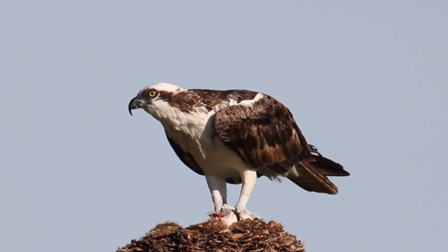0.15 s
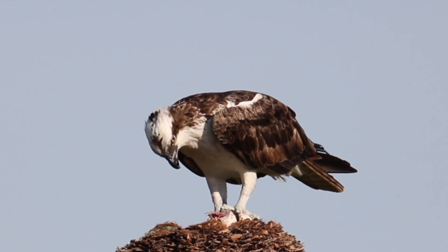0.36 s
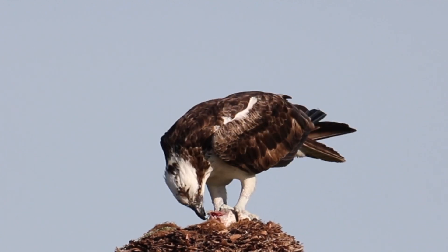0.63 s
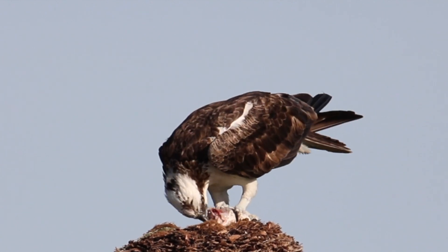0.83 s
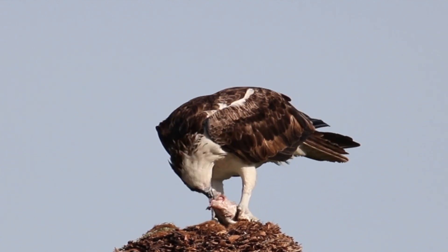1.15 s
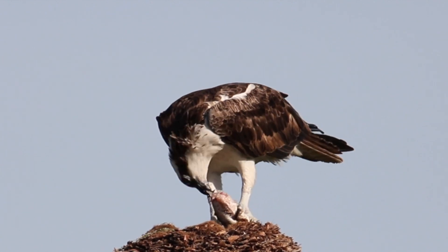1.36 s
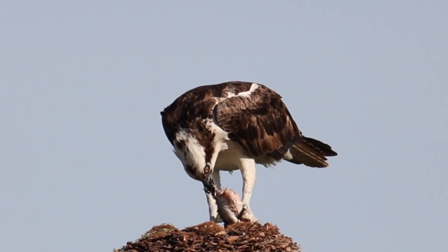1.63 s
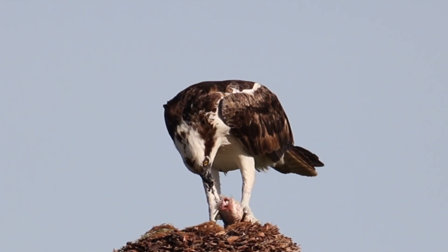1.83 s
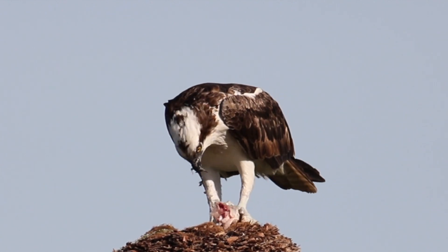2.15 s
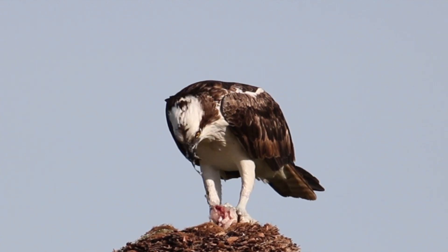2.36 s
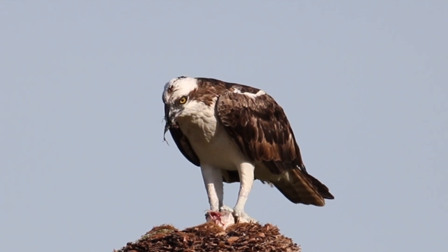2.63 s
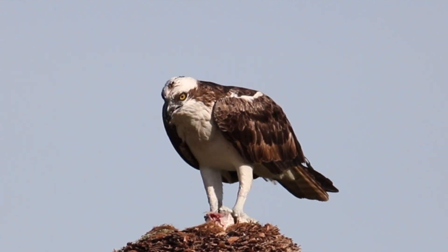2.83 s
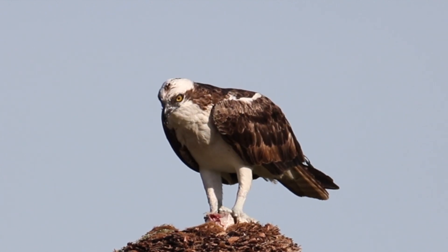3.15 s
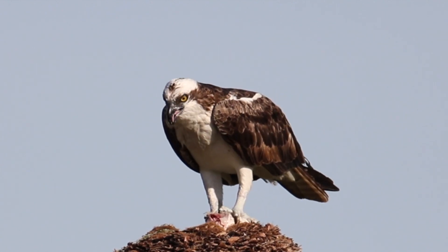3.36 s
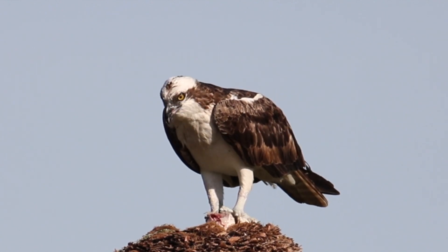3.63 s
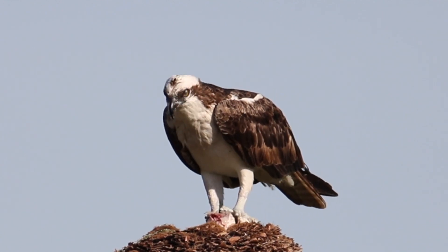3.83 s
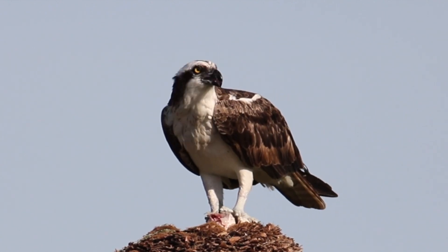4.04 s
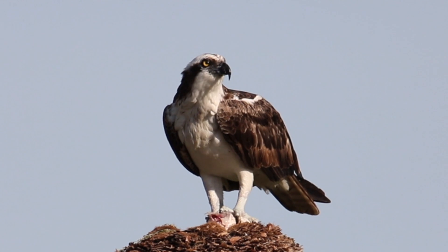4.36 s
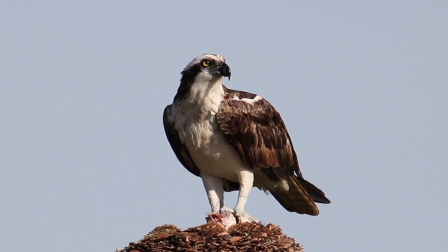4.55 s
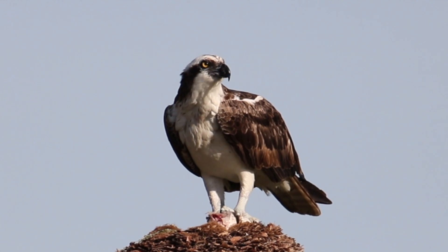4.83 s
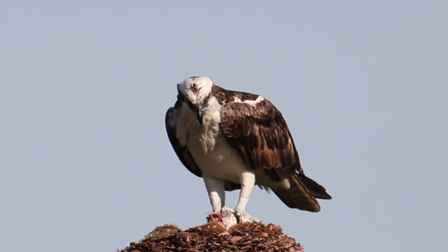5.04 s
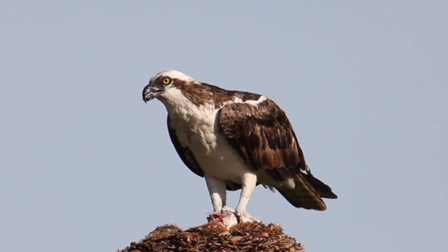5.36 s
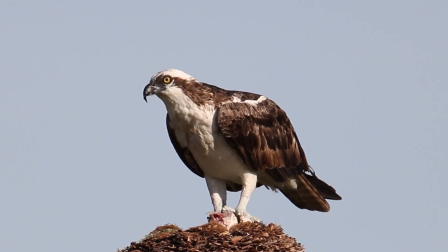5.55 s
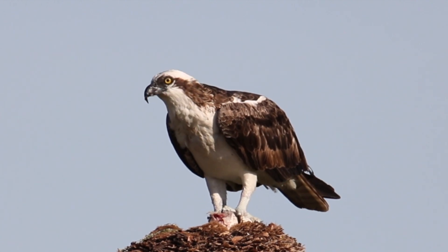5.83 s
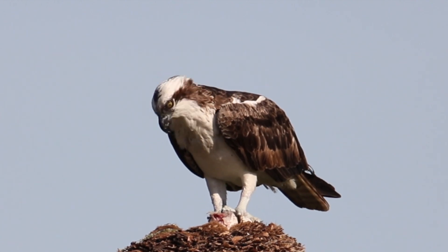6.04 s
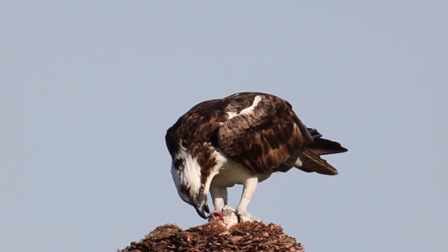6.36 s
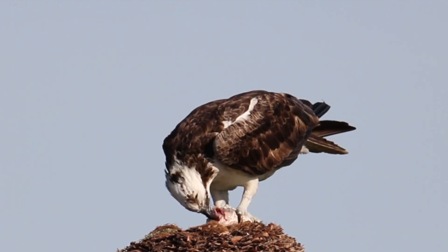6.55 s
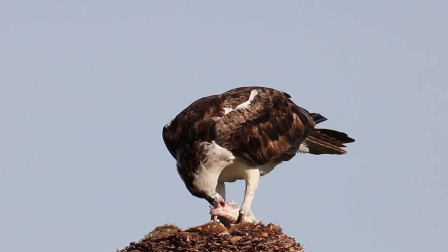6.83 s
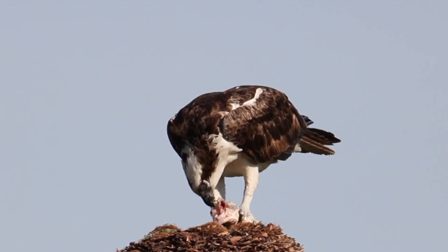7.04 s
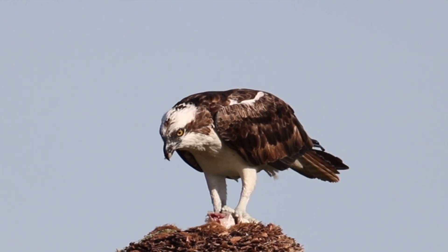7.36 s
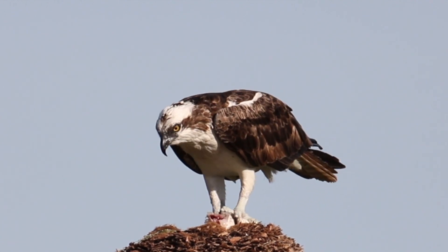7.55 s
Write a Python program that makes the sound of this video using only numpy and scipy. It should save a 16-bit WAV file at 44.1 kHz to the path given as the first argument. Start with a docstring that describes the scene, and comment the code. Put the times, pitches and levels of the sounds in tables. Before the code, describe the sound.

An osprey gives four short, clear falling whistles outdoors, with faint bird chips, soft cricket pulses, distant low rumble and steady airy hiss.

```python
"""An osprey on a palm stump gives short falling whistles, each beating against its own close reflection.
The whistles are gliding tones with weak overtones, echoed by nearby palms and a farther tree line.
A songbird in foliage chips three times in quick upward sweeps; crickets pulse falling tones near 8 kHz.
Behind them, shaped noise and wavering tones make distant traffic, an engine, machinery, air and light wind.
One microphone feeds the left channel; the right carries only preamplifier hiss."""
import sys
import numpy as np
from scipy import signal
from scipy.fft import rfft, irfft
from scipy.io import wavfile
from scipy.ndimage import uniform_filter1d

SR = 44100
rng = np.random.default_rng(int(sys.argv[2]) if len(sys.argv) > 2 else 0)


def store_pcm(level_fs):
    """Save levels as 16-bit WAV."""
    pcm = np.round(np.clip(level_fs, -1, 1) * 32767).astype(np.int16)
    wavfile.write(sys.argv[1], SR, np.atleast_2d(pcm).T)


N = 339129
TIME = np.arange(N) / SR

# osprey whistles; the first sounds before the start, so only its echoes are heard:
# (start [s], sagging part [s], dropping part [s], opening lift [Hz], knee pitch [Hz], level [dB],
#  octave level [dB], change of higher overtones [dB], change of echoes [dB])
WHISTLES = [(-.12, .053, .05, 200, 2500, -14.5, -20, -6, 1.5),
            (.9501, .056, .046, 264, 2462, -15.7, -15.5, -13, 4),
            (2.0995, .0485, .052, 216, 2526, -13.1, -19.5, -5, 1),
            (3.3087, .056, .043, 218, 2525, -13.3, -18.5, 0, .5),
            (4.817, .05, .044, 117, 2464, -11.9, -19, -6, 0)]
# whistle overtones above the octave: (multiple of the pitch [ratio], level [dB])
OVERTONES = [(3, -33), (4, -34), (5, -45)]
# separate echoes of the whistle from trunks and trees: (delay [s], level [dB])
TREE_ECHOES = [(.018, -22), (.041, -20), (.105, -26), (.262, -40)]
# songbird chips: (start [s], length [s], level [dB], octave level [dB], change of leaf echoes [dB])
CHIPS = [(1.955, .018, -23.8, -18.5, 0), (3.338, .0145, -28.3, -15, 5.3), (6.3153, .013, -21.5, -14, -3.5)]
# course of a chip: (share of its length [0-1], pitch [Hz], change of level [dB])
CHIP_SHAPE = [(0, 5480, -11), (.2, 5830, 1), (.45, 6550, -1), (.72, 7230, -.5), (1, 7120, -7)]
# bouts of steady chirping, each by one cricket:
# (first chirp [s], last chirp [s], approximate time between chirps [s], pitch [Hz], level [dB])
BOUTS = [(.165, 1.28, .186, 7940, -43.5), (1.514, 3.42, .19, 7960, -43.2),
         (3.642, 6.213, .1836, 7960, -43.2), (6.479, 7.548, .178, 7980, -42.5),
         (3.603, 6.523, .1825, 8220, -46), (6.741, 7.522, .195, 8200, -46.5), (.03, 2.66, .202, 7620, -50),
         (2.82, 5.19, .182, 7620, -50), (5.39, 7.61, .202, 7620, -49), (2.35, 7.1, .262, 8740, -52.5),
         (2.45, 5.72, .27, 6950, -54)]
# wind on the microphone: (frequency [Hz], density [dB per Hz])
WIND = [(8, -64.5), (18, -67), (30, -72), (50, -73.5), (120, -100), (400, -130)]
# gusts on the microphone: (middle [s], half length [s], level [dB])
GUSTS = [(0, .17, 14), (.55, .2, 5.5), (4.6, .45, 2.5), (6.6, .8, 1)]
# distant traffic: (frequency [Hz], density [dB per Hz])
TRAFFIC = [(20, -103), (43, -86), (62, -66.5), (85, -67.5), (125, -69), (170, -78), (260, -90), (600, -110)]
# a far engine that swells and fades: (frequency [Hz], density [dB per Hz])
ENGINE = [(100, -89), (150, -74), (200, -79), (250, -77.5), (320, -96), (600, -115)]
# the two swells of the far engine: (middle [s], half length [s], level [dB])
ENGINE_SWELLS = [(2.65, .45, -2), (4.25, .65, 1.5)]
# far machinery: (pitch [Hz], rms level [dB], pitch wander [share], loss as the background eases [dB])
MACHINERY = [(60, -59.5, .0065, 2.5), (491, -67.5, .0057, 9), (850, -63, .022, 8.5)]
# open air: (frequency [Hz], density [dB per Hz])
AIR = [(100, -84.5), (260, -82), (420, -82), (600, -78.5), (1500, -81), (2200, -83.5), (3200, -82.5),
       (4100, -89.5), (6500, -90), (9000, -94.5), (12000, -102), (15500, -107)]
# preamplifier hiss: (frequency [Hz], density [dB per Hz])
HISS = [(20, -100), (120, -94.5), (400, -96.5), (1500, -100), (8000, -101), (15500, -101)]

# whistle pitch: an opening lift dies away, the held pitch sags to the knee, then drops and levels out
HOLD_HZ, END_HZ = 2618, 2212
LIFT_S, SAG_POWER, DROP_POWER = .0272, 2.58, 1.61  # decay of the lift; bend of the sag and of the drop
FLICK_HZ, FLICK_S = 130, .003  # the very first moment is higher still
# whistle strength: it swells up to the knee, weakens evenly during the drop, then shuts off
SWELL_DB, SWELL_POWER, RELEASE_DB = 12, 4.1, 10.5
STOP_S = .009
BOUNCE_S = .005253  # delay of the close reflection
# how one chirp differs from the next: timing [s], strength [dB], share of pitch
CHIRP_SLIP_S, CHIRP_SCATTER_DB, CHIRP_DETUNE = .003, 1.0, .003
CALM_DB = -2.5  # wind between gusts
ENGINE_IDLE_DB = -12
ENGINE_HZ, ENGINE_TONE_DB = 189, -69  # the engine's note, before its swells
EASE_S, EASE_OVER_S = 3.2, .6  # the far background grows a little quieter around this time
AIR_DB, AIR_EASE_DB = .4, 1.1  # change of the air before easing, and its loss
TOP_HZ = 15850


def undb(db):
    """Decibels to gain."""
    return 10 ** (np.asarray(db) / 20)


def add(track, start, sound):
    """Mix a sound into a track; it may begin before the track does."""
    i = int(round(start * SR))
    part = sound[max(-i, 0):max(len(track) - i, 0)]
    track[max(i, 0):max(i, 0) + len(part)] += part


def walk(rate, size=N):
    """Smooth random drift with a spread near 1; rate sets its new random steps per second."""
    k = max(int(SR / rate), 1)
    steps = np.repeat(rng.standard_normal(size // k + 1), k)
    return 1.288 * uniform_filter1d(uniform_filter1d(steps, k), k)[:size]


def noise(spectrum):
    """Noise shaped to a density given as (frequency [Hz], density [dB per Hz]) points."""
    hz, db = np.transpose(spectrum)
    bins = np.maximum(np.fft.rfftfreq(N, 1 / SR), 1)
    gain = undb(np.interp(np.log(bins), np.log(hz), db))
    return irfft(rfft(rng.standard_normal(N)) * gain, N) * np.sqrt(SR / 2)


def turn(hz):
    """Running phase of an oscillator."""
    return 2 * np.pi * np.cumsum(hz) / SR


def soften(x, hz):
    """Gentle loss of treble, with no delay."""
    lowpass = signal.butter(2, min(hz, .45 * SR), fs=SR, output="sos")
    return signal.sosfiltfilt(lowpass, x)


def fade(size):
    """Rounded ends for a short note."""
    return signal.windows.tukey(size, .06)


def scatter(sound, db, t60, gap, dull_hz, per_s=900):
    """Duller echoes from many separate leaves and branches, building up over a gap [s], then dying away."""
    t = np.arange(SR) / SR
    leaves = rng.standard_normal(SR) * (rng.random(SR) < per_s / SR)
    echoes = leaves * undb(-60 * t / t60) * (1 - np.exp(-(t / gap) ** 2))
    return signal.fftconvolve(soften(sound, dull_hz), echoes * undb(db) / np.linalg.norm(echoes))


def swells(table, rest_db):
    """Gain of bell-shaped swells, added in power to a resting level."""
    power = undb(rest_db) ** 2
    for middle, half, db in table:
        power = power + undb(db) ** 2 * np.exp(-((TIME - middle) / half) ** 2)
    return np.sqrt(power)


def osprey(bounce_db=-2, bounce_hz=4200, beam_db=4.5):
    """A close reflection strengthens and cancels each sliding whistle in turns; trees echo it from farther."""
    near, far = np.zeros(N), np.zeros(N)
    for start, held, fall, lift_hz, knee_hz, db, octave_db, upper_db, wet_db in WHISTLES:
        tone, overtones = undb(db) * whistle(held, fall, lift_hz, knee_hz, octave_db, upper_db)
        call = tone + overtones
        add(near, start, call)
        for delay, echo_db in TREE_ECHOES:
            add(near, start + delay, undb(echo_db + wet_db) * soften(call, bounce_hz))
        # the beak beams its overtones into the surroundings
        spread = undb(wet_db) * (tone + undb(beam_db) * overtones)
        palms = scatter(spread, db=-18, t60=0.22, gap=0.033, dull_hz=8000, per_s=1300)
        tree_line = scatter(spread, db=-21, t60=0.76, gap=0.07, dull_hz=4500, per_s=1200)
        add(near, start, palms)
        add(far, start, tree_line)
    add(far, BOUNCE_S, undb(bounce_db) * soften(near, bounce_hz))
    return near + far


def whistle(held, fall, lift_hz, knee_hz, octave_db, upper_db, jitter=0.0013, flutter_db=.6, rasp_db=2):
    """A nearly pure tone that sags, then drops, and unsteady overtones that grow as the bird pushes harder."""
    t = np.arange(int((held + fall) * SR)) / SR
    sag = np.clip(t / held, 0, 1)
    drop = np.clip((t - held) / fall, 0, 1)

    swell_db = -SWELL_DB * (1 - sag) ** SWELL_POWER
    effort = undb(swell_db - RELEASE_DB * drop + flutter_db * walk(400, size=len(t)))
    effort = effort * np.clip((held + fall - t) / STOP_S, 0, 1)

    falling = END_HZ + (knee_hz - END_HZ) * (1 - drop) ** DROP_POWER
    sagging = (HOLD_HZ - knee_hz) * (1 - sag ** SAG_POWER)
    opening = lift_hz * np.exp(-t / LIFT_S) + FLICK_HZ * np.exp(-t / FLICK_S)
    phase = turn((falling + sagging + opening) * (1 + jitter * walk(500, size=len(t))))

    octave = undb(octave_db) * effort ** 0.25 * np.sin(2 * phase)
    upper = np.zeros(len(t))
    for multiple, db in OVERTONES:
        rasp = rasp_db * walk(300, size=len(t))
        upper += undb(db + upper_db + rasp) * np.sin(round(multiple) * phase)
    return np.array([np.sin(phase), octave + effort * upper]) * effort * fade(len(t))


def songbird():
    """Very short upward flicks from inside foliage, smeared by the leaves around the bird."""
    out = np.zeros(N)
    shares, pitch, effort = np.transpose(CHIP_SHAPE)
    for start, length, db, octave_db, wet_db in CHIPS:
        u = np.linspace(0, 1, int(length * SR))
        phase = turn(np.interp(u, shares, pitch) * (1 + 0.016 * walk(890, size=len(u))))
        octave = undb(octave_db + 1.8 * walk(700, size=len(u))) * np.sin(2 * phase)
        strength = undb(db + np.interp(u, shares, effort))
        chip = (np.sin(phase) + octave) * strength * fade(len(u))
        add(out, start, chip)
        # a dense early smear, then a longer, fainter one
        add(out, start, scatter(chip, db=wet_db - 2.5, t60=0.081, gap=0.0024, dull_hz=17000, per_s=6400))
        add(out, start, scatter(chip, db=wet_db - 8.5, t60=0.5, gap=0.015, dull_hz=14500, per_s=7000))
    return out


def crickets():
    """Several crickets, louder and fainter; each bout keeps a steady beat with slight slips."""
    out = np.zeros(N)
    for first, last, period, hz, db in BOUTS:
        beats = int(round((last - first) / period)) + 1
        for beat in np.linspace(first, last, beats):
            slip, strength, detune = rng.standard_normal(size=3)
            pitch = hz * (1 + CHIRP_DETUNE * detune)
            sound = chirp(pitch) * undb(db + CHIRP_SCATTER_DB * strength)
            middle = beat + CHIRP_SLIP_S * slip
            add(out, middle - len(sound) / SR / 2, sound)
    return out + scatter(out, db=-13, t60=.2, gap=0.009, dull_hz=14000)[:N]


def chirp(hz, length=0.05, stroke_hz=124, sag=0.038, slide=0.039, scrape=0.0105):
    """A few wing strokes, each a brief falling tone; the first and last are weaker and flatter."""
    t = np.arange(int(length * (1 + 0.11 * rng.uniform(-1.1, 1)) * SR)) / SR
    edge = (2 * t / t[-1] - 1) ** 2  # 1 at both ends, 0 in the middle
    stroke = (t * stroke_hz + rng.random()) % 1
    pitch = hz * (1 - sag * edge ** 2 + slide * (.5 - stroke) + scrape * walk(900, size=len(t)))
    return np.sin(turn(pitch)) * np.sin(np.pi * stroke) ** 2 * (1 - edge ** 3)


def outdoors():
    """Mix the wind at the microphone with the far sounds and the open air."""
    eased = .5 + .5 * np.tanh((TIME - EASE_S) / EASE_OVER_S)  # 0 before, 1 after
    return wind() + traffic() + engine() + machinery(eased) + air(eased)


def wind():
    """Low noise from wind buffeting the microphone, swelling in gusts."""
    return noise(WIND) * swells(GUSTS, CALM_DB) * undb(.99 * walk(7))


def traffic():
    """A distant low rumble of noise with a slightly wandering level."""
    return noise(TRAFFIC) * undb(.7 * walk(6.5))


def engine():
    """A far engine: low noise and one wavering note swell and fade together."""
    note = undb(ENGINE_TONE_DB) * hum(ENGINE_HZ, wander=.0073)
    return (noise(ENGINE) + note) * swells(ENGINE_SWELLS, ENGINE_IDLE_DB)


def machinery(eased):
    """Far machine tones, each losing level as the background eases."""
    return sum(undb(db - lost_db * eased) * hum(hz, wander) for hz, db, wander, lost_db in MACHINERY)


def hum(hz, wander, waver_db=2.4):
    """A far tone with an rms near 1 that wavers in pitch and level."""
    level = np.sqrt(2) * undb(waver_db * walk(4.96))
    return level * np.sin(turn(hz * (1 + wander * walk(9))))


def air(eased):
    """The nearly even broadband hiss of open air, easing a little."""
    return noise(AIR) * undb(AIR_DB - AIR_EASE_DB * eased + .14 * walk(3.65))


def scene():
    """Everything reaches the one microphone on the left."""
    left = osprey() + songbird() + crickets() + outdoors()
    return np.array([left, np.zeros(N)])


def record(dry):
    """Each channel's preamplifier adds its own hiss; the top is cut steeply."""
    hiss = np.array([noise(HISS), noise(HISS)])
    steep_cut = signal.ellip(12, .1, 70, TOP_HZ, fs=SR, output="sos")
    return signal.sosfilt(steep_cut, dry + hiss)


dry = scene()
out = record(dry)
store_pcm(out)
```